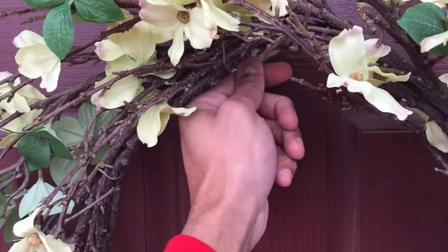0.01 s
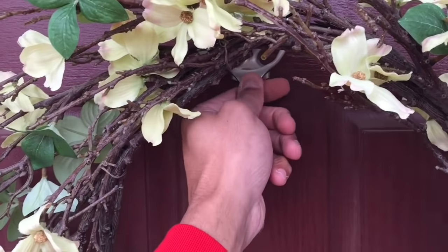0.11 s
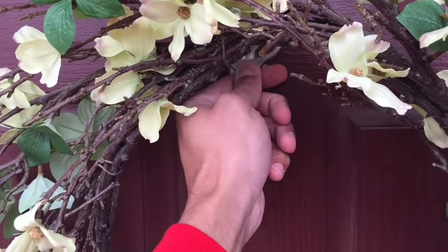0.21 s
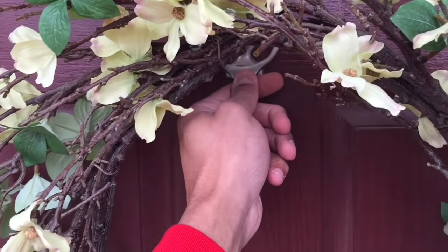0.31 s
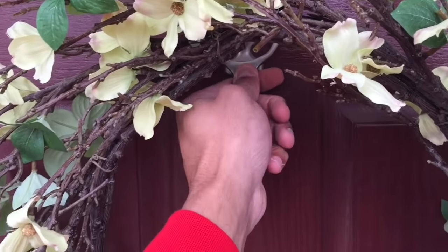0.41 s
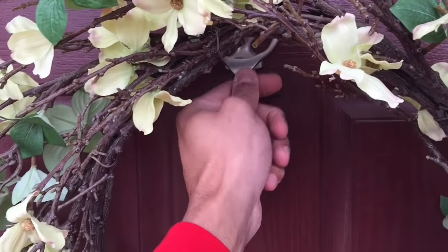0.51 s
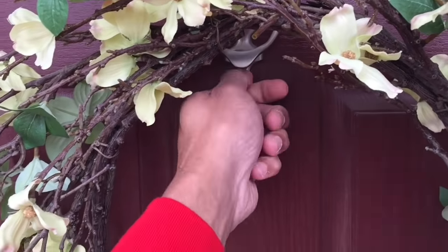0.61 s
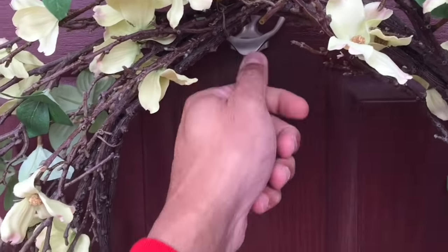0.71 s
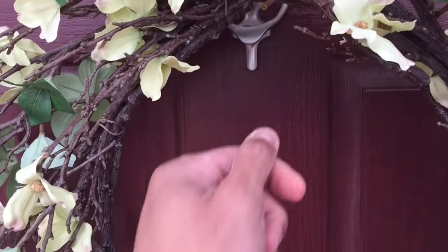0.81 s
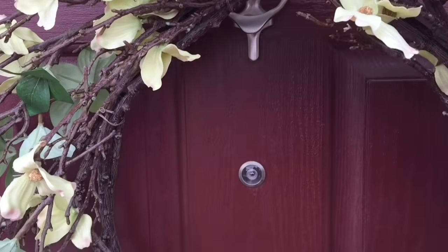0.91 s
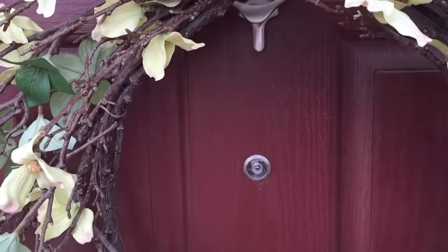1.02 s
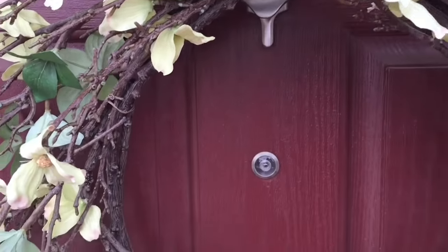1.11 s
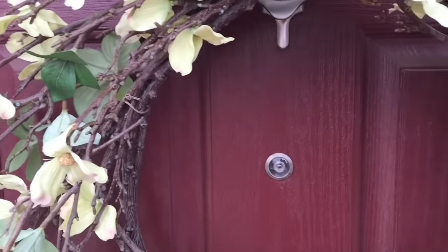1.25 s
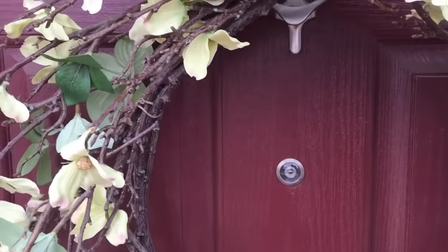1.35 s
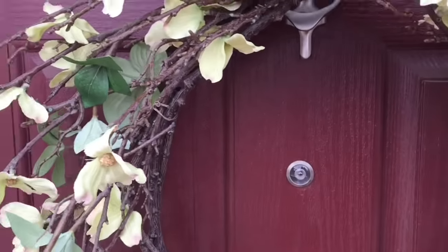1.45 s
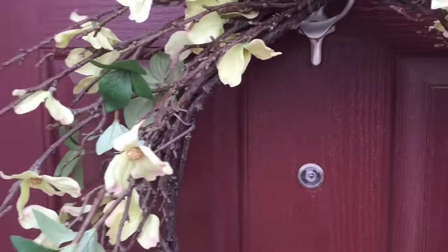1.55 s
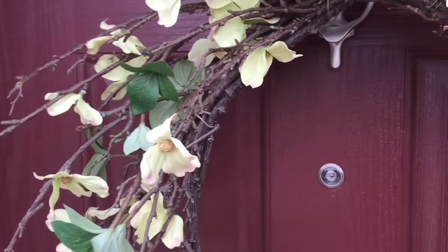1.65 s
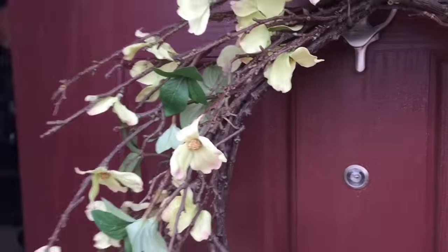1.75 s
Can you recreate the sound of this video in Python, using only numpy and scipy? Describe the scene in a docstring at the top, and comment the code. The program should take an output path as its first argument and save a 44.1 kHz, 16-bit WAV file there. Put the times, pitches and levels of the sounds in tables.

```python
"""A front porch, close to the door: a metal knocker is rapped, rattles on its hinge and is let go.
Raps are noise cracks, ringing metal and door modes and a dense noise ring; the porch adds a dull echo.
Low thumps are dying sines. Then a hollow knock of modes and a gritty scrape of tiny noise slips,
probably a shoe stepping back, over quiet outdoor air made of coloured noise.
The loud raps overload the microphone."""
import sys
import numpy as np
from scipy import signal
from scipy.fft import rfft, irfft
from scipy.io import wavfile

SR = 44100
rng = np.random.default_rng(int(sys.argv[2]) if len(sys.argv) > 2 else 0)


def int16_out(signal):
    """Quantize to a 16-bit WAV file."""
    q = np.round(np.clip(np.atleast_2d(signal).T, -1, 1) * 32767)
    wavfile.write(sys.argv[1], SR, q.astype(np.int16))


N = 79380
T = np.arange(SR // 2) / SR  # s, the life of one blow


def amp(db):
    """Decibels to gain."""
    return 10 ** (np.asarray(db) / 20)


def evened(x):
    """Scales to rms 1."""
    return x / np.sqrt(np.mean(x ** 2) + 1e-20)


def add(mix, start_s, sound):
    """Mixes a sound in at start_s; whatever falls outside the mix is cut off."""
    at = int(round(start_s * SR))
    sound = sound[max(-at, 0):]
    part = mix[max(at, 0):][:len(sound)]
    part += sound[:len(part)]


def filtered(x, gain):
    """Filters by a gain given as a function of frequency."""
    f = np.fft.rfftfreq(2 * len(x), 1 / SR) + 1  # +1 Hz keeps logs and ratios finite
    return irfft(rfft(x, 2 * len(x)) * gain(f))[:len(x)]


def coloured(x, points):
    """Shapes x by a gain curve through (Hz, dB) points, then scales to rms 1."""
    hz, db = np.transpose(points)
    return evened(filtered(x, lambda f: amp(np.interp(np.log(f), np.log(hz), db))))


def rise(seconds):
    """Exponential attack of a blow."""
    return 1 - np.exp(-T / seconds)


def decay(t60_s):
    """Exponential decay by 60 dB in t60_s."""
    return np.exp(-np.log(1000) * T / t60_s)


def ring(modes):
    """Struck modes: dying sines of alternating sign."""
    out = np.zeros(len(T))
    for k, (hz, db, t60_s) in enumerate(modes):
        out += (-1) ** k * amp(db) * decay(t60_s) * np.sin(2 * np.pi * hz * T)
    return out


def wash(bands):
    """Countless modes and echoes: noise whose bands each die at their own speed."""
    hz, db, t60_s = np.transpose(bands)
    log_f = np.log(np.fft.rfftfreq(len(T), 1 / SR) + 1)
    noise = rfft(rng.standard_normal(len(T))) * amp(np.interp(log_f, np.log(hz), db))
    out = np.zeros(len(T))
    for band, band_t60_s in zip(np.eye(len(hz)), t60_s):
        weight = np.interp(log_f, np.log(hz), band)  # overlapping triangles that sum to 1
        out += irfft(noise * weight, len(T)) * decay(band_t60_s)
    return out


# Spectrum of the outdoor air. Each row: frequency in Hz, relative level in dB per Hz.
AIR_COLOUR = [(20, -23), (40, 4.5), (70, 1.5), (120, 1), (250, -14.5), (500, -13), (1100, -13.5),
              (2200, -22.5), (3500, -31), (7000, -41), (16000, -47.5)]
AIR_DB, AIR_SWELL_DB = -46, 1  # mid level; rms of the swell


def air():
    """Distant outdoor rumble: coloured noise that swells a little, slower than about 8 Hz."""
    swell = evened(filtered(rng.standard_normal(N), lambda f: np.exp(-(f / 8) ** 2)))
    return amp(AIR_DB + AIR_SWELL_DB * swell) * coloured(rng.standard_normal(N), AIR_COLOUR)


# Soft low thumps. Each row: start in seconds, level in dB, pitch in Hz, t60 in seconds.
THUMPS = [(0.7721, -5.5, 66.6, 0.18), (0.867, -26, 79.8, 0.23), (.965, -29.5, 128, 0.18),
          (.98, -33, 75.5, 0.24), (1.125, -33, 72, .4), (1.246, -32, 69.8, 0.29), (1.394, -14, 67, 0.14),
          (1.451, -18, 66.7, 0.11), (1.561, -31.5, 82, 0.21)]
THUMP_RISE_S = 0.0066


def thumps():
    """Low booms, one dying sine each, as the hand leaves the door and weight shifts on the porch."""
    out = np.zeros(N)
    for start_s, db, hz, t60_s in THUMPS:
        add(out, start_s, ring([(hz, db, t60_s)]) * rise(THUMP_RISE_S) ** 2)
    return out


# Scrape of the sole. Each row: time in seconds, level of the body, of the rasp and of the hiss in dB.
SCRAPE_LEVELS = [(1.37, -66, -63, -86), (1.388, -36, -37.5, -33), (1.403, -29, -29, -31),
                 (1.425, -39, -33.5, -48), (1.448, -39.5, -42, -46), (1.461, -28.5, -37.5, -43.5),
                 (1.49, -42.5, -46.5, -50), (1.51, -42.5, -43, -38), (1.521, -24, -36, -31),
                 (1.537, -38.5, -41, -48), (1.56, -32.5, -36.5, -56), (1.585, -36, -38.5, -65),
                 (1.604, -37.5, -55, -67), (1.62, -39, -32, -56), (1.64, -44, -57, -70.5),
                 (1.675, -46.5, -51, -72), (1.74, -67.5, -78, -63), (1.786, -49.5, -47.5, -68.5)]
# Spectra of body, rasp and hiss. Each row: frequency in Hz, relative level in dB per Hz.
BODY_COLOUR = [(40, -6), (200, 1), (850, -2), (1400, -11), (2500, -30), (16000, -68)]
RASP_COLOUR = [(500, -39), (1300, 5.5), (2300, 4.5), (3200, -0.5), (4600, -7), (7000, -23), (16000, -43)]
HISS_COLOUR = [(2500, -25.5), (6000, 4.5), (10000, -2.5), (13500, 1), (16000, 1.5)]
GRAINS_PER_S, GRAIN_SPREAD_DB = 7000, 2.6


def scrape():
    """A dragged sole sheds thousands of tiny slips of uneven size."""
    t = np.arange(N) / SR
    times_s, *levels = np.transpose(SCRAPE_LEVELS)
    out = np.zeros(N)
    for colour, level_db in zip((BODY_COLOUR, RASP_COLOUR, HISS_COLOUR), levels):
        slips = (rng.random(N) < GRAINS_PER_S / SR) * rng.standard_normal(N)
        slips *= amp(GRAIN_SPREAD_DB * np.minimum(rng.exponential(1, N), 4))
        envelope = np.where(t > times_s[0], amp(np.interp(t, times_s, level_db)), 0)
        out += coloured(slips, colour) * envelope
    return out


# Grit cracking under the sole. Each row: start in seconds, level in dB, centre in Hz, width in octaves.
GRIT_SNAPS = [(1.3975, -22, 3500, 1), (1.4095, -16, 13000, .7), (1.4165, -18, 10000, 1.2),
              (1.4390, -26, 3000, .6), (1.4545, -17, 3100, .6), (1.5180, -17, 900, 1),
              (1.5255, -22, 3500, 1.4), (1.5560, -27, 1500, 1), (1.5700, -28, 3000, 1),
              (1.5765, -35, 9000, 1), (1.666, -40, 3000, 1), (1.6135, -29, 2900, .7),
              (1.6180, -30, 1800, .5), (1.6240, -29, 2700, .6)]
GRIT_DECAY_S, GRIT_TAIL_DB, GRIT_TAIL_DECAY_S = 0.00085, -21, 0.013  # time constants; tail re snap


def grit():
    """Single larger grains snap: band noise, each with a short echo as a weak slower decay."""
    fade = np.exp(-T / GRIT_DECAY_S) + amp(GRIT_TAIL_DB) * np.exp(-T / GRIT_TAIL_DECAY_S)
    out = np.zeros(N)
    for start_s, db, hz, octaves in GRIT_SNAPS:
        noise = rng.standard_normal(len(T))
        snap = filtered(noise, lambda f: 1 / (1 + (np.log2(f / hz) / octaves) ** 2) ** 2)
        add(out, start_s, amp(db) * evened(snap) * fade)
    return out


# Modes of the hollow surface under the heel. Each row: frequency in Hz, level in dB, t60 in seconds.
STEP_MODES = [(203.7, -22.5, 0.2), (283, -33, .1), (356.6, -17, 0.12), (504, -20.5, 0.092),
              (542, -18.5, 0.098), (630, -37, .1), (749, -17, 0.086), (930, -27, 0.16), (1870, -16, 0.063)]
# Dense ring of the step. Each row: frequency in Hz, relative level in dB per Hz, t60 in seconds.
STEP_WASH = [(60, -23, 0.43), (318, -4, 0.21), (705, 1, 0.14), (1390, -13, 0.13), (2120, -5.5, 0.096),
             (3000, -13, 0.074), (5800, -19, 0.045), (16000, -24.5, 0.021)]
STEP_S, STEP_WASH_RISE_S, STEP_MODES_RISE_S = 1.1120, 0.0031, 0.0056


def step():
    """A heel lands with a hollow knock: surface modes plus a dense noise ring."""
    out = np.zeros(N)
    body = ring(STEP_MODES) * rise(STEP_MODES_RISE_S)
    dense = wash(STEP_WASH) * rise(STEP_WASH_RISE_S)
    add(out, STEP_S, body + dense)
    return out


# Modes of the knocker, then of the door. Each row: frequency in Hz, relative level in dB, t60 in seconds.
KNOCKER_MODES = [(1261, -15, 0.057), (1332, -17, .09), (1582, -12.5, 0.08), (1678, -14.5, 0.057),
                 (1985, -6, 0.025), (2157, -15, 0.077), (2749, -15, 0.041), (2938, -30.5, 0.091),
                 (3446, -20.5, 0.038), (3933, -17.5, 0.037), (4420, -17, 0.04), (5770, -27.5, 0.048),
                 (8172, -21.5, 0.031), (11150, -29, 0.048), (11970, -29.5, .055)]
DOOR_MODES = [(67.8, -26.5, .4), (85.2, -23.5, 0.35), (111, -23, 0.21), (156.3, -18, 0.17),
              (205.9, -25.5, .36), (239.7, -31.5, 0.36), (273.7, -19, .21), (344.8, -28, .17),
              (397.7, -21, 0.1), (437.6, -18.5, .15), (473.5, -13.5, 0.13), (585.5, -22, 0.13),
              (652, -25, 0.072), (867, -16.5, .09), (932, -23.5, .08), (1067, -17.5, 0.04)]
RESONANCE_DB, RESONANCE_Q = 5, 35
STRIKE_SPREAD_DB = 0.8


def resonant(f):
    """Gain that lifts the dense ring near the modes of knocker and door."""
    nearness = 0
    for hz, _, _ in KNOCKER_MODES + DOOR_MODES:
        nearness = nearness + 1 / (1 + (2 * RESONANCE_Q * (f / hz - 1)) ** 2)
    return amp(RESONANCE_DB * np.minimum(nearness, 1))


def struck(modes):
    """Each blow lands a little differently and so weights the modes a little differently."""
    return ring([(hz, db + STRIKE_SPREAD_DB * rng.standard_normal(), t60_s) for hz, db, t60_s in modes])


METAL_RISE_S, DOOR_RISE_S, WASH_RISE_S = 0.0012, 0.0016, 0.0006
WASH_ALIKE = 0.64  # power share of the dense ring that is the same for every blow of a kind
CLINK_T60_S = 0.039  # the strongest metal mode, whose pitch shifts with the grip
CRACK_DECAY_S, CRACK_HZ = 0.0026, 7500  # bare metal contact: time constant, upper edge
SING_HZ, SING_DB, SING_T60_S = 10090, -52, 0.22  # thin high note that lingers in the metal
TREBLE_HZ = 3970  # midpoint of the treble shelf


def blows(rows, bands, wash_db, ring_db, clink_db, door_db, bass_hz):
    """Each contact cracks, rings the metal and shakes the door, with its own share of bass and treble."""
    out = np.zeros(N)
    shared = wash(bands)
    sing = ring([(SING_HZ, SING_DB, SING_T60_S)])
    for start_s, db, treble_db, bass_db, crack_db, clink_hz in rows:
        clink = ring([(clink_hz, clink_db, CLINK_T60_S)])
        metal = (amp(ring_db) * struck(KNOCKER_MODES) + clink) * rise(METAL_RISE_S)
        door = amp(door_db) * struck(DOOR_MODES) * rise(DOOR_RISE_S)
        dense = np.sqrt(WASH_ALIKE) * shared + np.sqrt(1 - WASH_ALIKE) * wash(bands)
        dense = amp(wash_db) * filtered(dense, resonant) * rise(WASH_RISE_S)
        noise = filtered(rng.standard_normal(len(T)), lambda f: 1 / (1 + (f / CRACK_HZ) ** 2))
        crack = amp(crack_db) * noise * np.exp(-T / CRACK_DECAY_S)

        def tone(f):
            """Treble and bass shelves of this blow."""
            treble = treble_db / (1 + (TREBLE_HZ / f) ** 2)
            bass = bass_db / (1 + (f / bass_hz) ** 4)
            return amp(treble + bass)

        blow = filtered(metal + door + dense + crack, tone)
        add(out, start_s, amp(db) * (blow + sing))
    return out


# Hard raps, the first already dying away, then light contacts of the loose knocker. Each row:
# start in seconds, relative level in dB, treble shelf in dB, bass shelf in dB, crack in dB, clink in Hz.
RAPS = [(-.030, -5, -9.5, 0.5, -7, 2010), (.2341, 0, -2.5, -4.5, 2, 2017),
        (.4635, -2.5, -1.5, 3, 0.5, 2023), (.6637, 0.5, 0, 4, 3, 2068)]
RATTLES = [(.0335, -30, 2, -7, -14, 2110), (.0520, -14.5, -4, 4.5, -2.5, 2013),
           (.1510, -13.5, -0.5, -7.5, -5.5, 2238), (.1930, -30, -12, 0.5, -18, 2220),
           (.2165, -26, -6, 2, -8, 2270), (.2265, -17.5, 13.5, -0.5, -10, 2220),
           (.2945, -38, 7, -4, -1, 2100), (.3040, -18.5, -12, 5.5, -12, 2080),
           (.3255, -21, -6, 0, -3.5, 2000), (.3755, -19.5, -9, -6.5, -24, 2510),
           (.4020, -39, -11, -4, -12, 2260), (.4275, -34, -10.5, -2.5, -18.5, 2200),
           (.4468, -19, 4, -4.5, -23, 2195), (.5495, -16.5, 1.5, -2, -4.5, 2080),
           (.5850, -20.5, -25, 4.5, -9, 2070), (.6420, -37, 2, 0, -16, 2100),
           (.6520, -25.5, -10.5, 4.5, 3, 2100), (.6575, -12, 10, 0, -30, 2170), (.7628, -8, 3, -4, 4, 2250),
           (.7730, -13.5, 3.5, -7, -5, 2124), (.8105, -24.5, -11, -3, -16, 2250),
           (.9240, -28.5, -22.5, -2, -17, 2330), (.9420, -31.5, -13, -1.5, -14, 2370),
           (.9525, -17.5, -17.5, 0.5, -19.5, 2260), (1.2130, -32.5, -24, 3, -18, 2260),
           (1.2590, -31, -15.5, 0.5, -19, 2640)]
# Dense ring of door and porch after a rap, then after a light contact.
# Each row: frequency in Hz, relative level in dB per Hz, t60 in seconds.
RAP_WASH = [(40, -9.5, 0.54), (130, -8.5, 0.46), (310, 1, 0.22), (725, 0, .14), (1300, 0.5, 0.089),
            (2100, 0, 0.1), (4100, 1.5, 0.055), (6400, -9.5, 0.07), (9500, -9.5, 0.062), (12300, -5, 0.059),
            (16000, -16, .06)]
RATTLE_WASH = [(40, -5.5, 0.33), (200, 2, 0.21), (710, -2.5, 0.15), (1400, -5, 0.084), (2200, 6, 0.094),
               (3100, -4.5, 0.072), (5500, -8, .06), (7800, -13.5, .06), (15600, -29, .06)]
ECHO_S, ECHO_DB, ECHO_HZ = 0.0212, -22.5, 1120  # dull echo from across the porch: delay, gain, upper edge


def knocker():
    """Hard raps, with the hinge rattling in between and after, and their low-passed echo."""
    out = blows(RAPS, RAP_WASH, wash_db=-1, ring_db=1.5, clink_db=-2, door_db=0, bass_hz=210)
    out += blows(RATTLES, RATTLE_WASH, wash_db=-2, ring_db=-11, clink_db=-4.5, door_db=-8, bass_hz=800)
    echo = filtered(out, lambda f: 1 / (1 + (f / ECHO_HZ) ** 4))
    add(out, ECHO_S, amp(ECHO_DB) * echo)
    return out


def scene():
    """Everything at the one microphone."""
    return (knocker() + thumps() + step() + scrape() + grit() + air())[None]


OVERLOAD_LEVEL, LOW_CUT_HZ, EDGE_HZ = 1.0, 35, 15850


def record(dry):
    """The microphone drops the deepest bass, overload flattens the loud raps; then the band limit."""
    low_cut = signal.butter(2, LOW_CUT_HZ, "high", fs=SR, output="sos")
    dry = signal.sosfilt(low_cut, dry)
    clipped = dry / (1 + (dry / OVERLOAD_LEVEL) ** 6) ** (1 / 6)
    band_limit = signal.firwin(301, EDGE_HZ, window=("kaiser", 7), fs=SR)
    return signal.oaconvolve(clipped, band_limit[None], "same")


dry = scene()
out = record(dry)
int16_out(out)
```